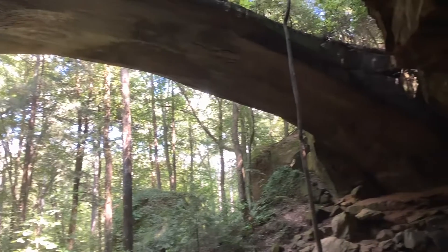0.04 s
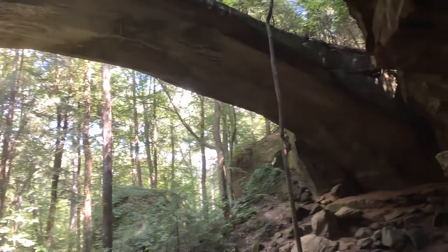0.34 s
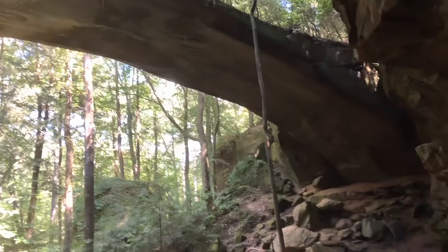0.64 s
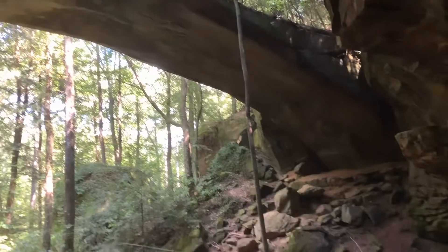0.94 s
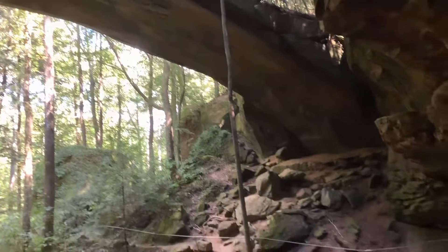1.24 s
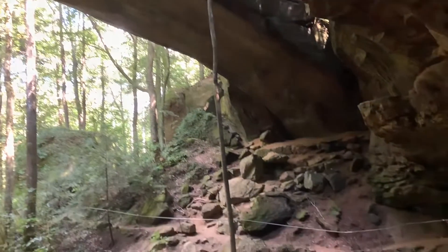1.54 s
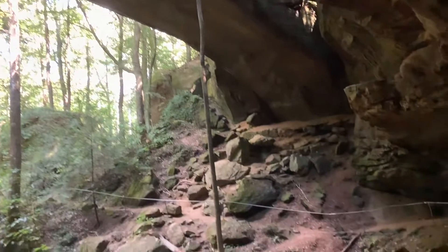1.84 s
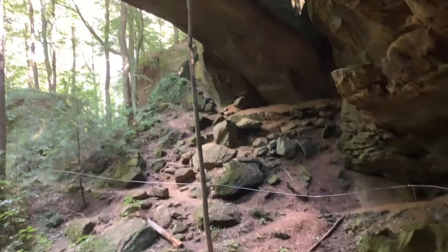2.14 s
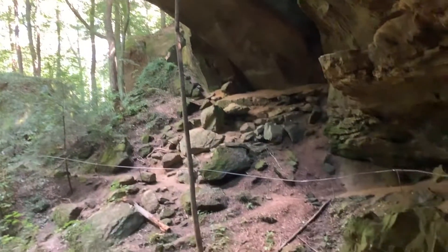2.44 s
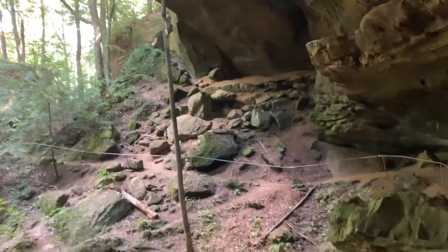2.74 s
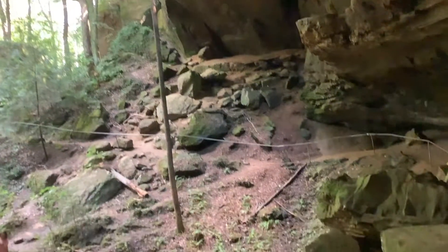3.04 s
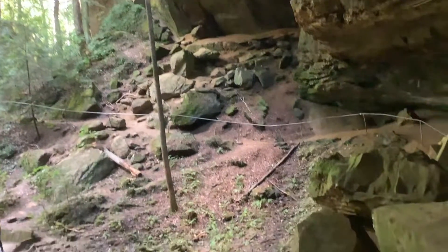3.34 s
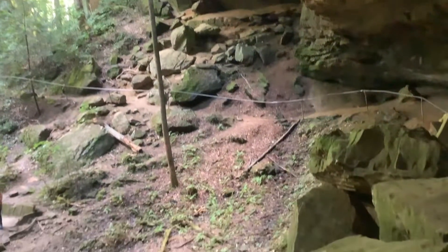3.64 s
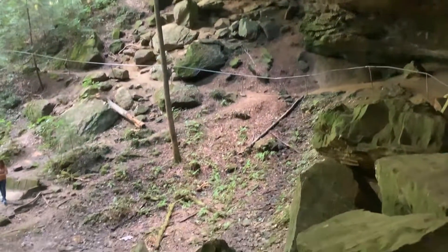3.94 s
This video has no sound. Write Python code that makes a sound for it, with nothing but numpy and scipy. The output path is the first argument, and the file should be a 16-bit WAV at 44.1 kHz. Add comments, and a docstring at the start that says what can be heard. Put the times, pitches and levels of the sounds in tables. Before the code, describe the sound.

Sparse drops of water tick and splash with a slight echo beneath a rock ledge in a quiet, faintly hissing forest. Dull footsteps and light scuffs sound nearby, soft at first and heavier toward the end.

```python
"""Water drips under a rock overhang in a forest: each impact ticks on stone or leaves, then spatters.
Soft taps and footfalls thud close by, each sweeping down in pitch because its bass arrives late.
Gritty scuffs and small splashes swell briefly. Beneath lie a steady hiss of leaves and water, low
outdoor noise, a faint rumble of air and a thin insect band. Reflection from the rock adds a short echo."""
import sys
import numpy as np
from scipy import signal
from scipy.fft import rfft, irfft, next_fast_len
from scipy.io import wavfile
from scipy.ndimage import uniform_filter1d, map_coordinates

SR = 44100
rng = np.random.default_rng(int(sys.argv[2]) if len(sys.argv) > 2 else 0)


def log_audio(samples):
    """Write samples as a 16-bit WAV file to the path given in sys.argv[1]."""
    # one column per channel
    frames = np.atleast_2d(samples).T
    # limit to full scale, then quantise
    limited = np.clip(frames, -1, 1)
    pcm = np.round(limited * 32767).astype(np.int16)
    wavfile.write(sys.argv[1], SR, pcm)


N = 176400

# Spectra of the background noises (frequency [Hz], relative density [dB])
HISS_SPECTRUM = [(500, -17), (900, -8.5), (1200, -3), (2300, 1), (4500, 0.5), (5900, -2.5), (7200, 0),
                 (8300, -8), (10000, -11), (12300, -20.5), (15600, -23)]
SPRAY_SPECTRUM = [(5000, -6.5), (9000, 0), (11500, -10), (15700, -12)]
FOREST_SPECTRUM = [(30, -65), (55, -54), (90, 2.5), (170, 0.5), (450, -6.5), (900, -10), (2000, -33),
                   (5000, -56)]
AIR_SPECTRUM = [(20, -52), (35, -40), (55, -2.5), (80, 8), (110, -17.5), (200, -10.5), (600, -63)]
# Their slow envelopes (time [s], level [dB])
HISS_ENVELOPE = [(0, -65), (.4, -60), (1.55, -60.5), (1.8, -57), (2.03, -57), (2.22, -62.5), (2.55, -59.5),
                 (2.88, -61.5), (3.25, -56), (4, -61)]
SPRAY_ENVELOPE = [(0, -63), (.42, -62.5), (.52, -67), (.87, -68), (1.8, -76.5), (1.93, -70), (2.21, -86),
                  (2.3, -65.5), (2.85, -76), (4, -81)]
FOREST_ENVELOPE = [(0, -71), (1.2, -63), (1.62, -61), (1.78, -56), (2.25, -62), (2.6, -55.5), (3.05, -60.5),
                   (4, -55)]
AIR_ENVELOPE = [(0, -61.5), (.65, -65), (1.05, -56), (1.45, -60), (4, -67.5)]
# Gritty scuffs and small water splashes (time [s], length [s], level [dB], centre [Hz], width [octaves])
GRAINY_SWELLS = [(0.106, 0.024, -51.5, 875, 0.86), (0.285, 0.02, -60, 1400, 0.44),
                 (0.766, 0.093, -56.5, 1970, 0.95), (0.981, 0.032, -56.5, 1840, 0.28),
                 (1.058, 0.054, -60, 1460, 0.37), (1.693, 0.028, -52.5, 1780, 0.28),
                 (2.069, 0.081, -57.5, 1830, 0.39), (2.427, 0.097, -53, 670, 0.4),
                 (2.755, 0.081, -48, 284, 0.37), (3.073, 0.13, -57, 3070, 0.72),
                 (3.291, 0.099, -54.5, 480, 0.72), (3.685, 0.07, -53, 1290, 0.72),
                 (3.793, 0.16, -55.5, 890, 0.87), (3.861, 0.17, -52, 3000, 0.29)]
# Taps and footfalls (time [s], first-contact level [dB], low edge [Hz], high edge [Hz])
SOFT_IMPACTS = [(.111, -31, 75.4, 251), (.114, -38.5, 378, 820), (0.141, -35.5, 64.6, 113),
                (0.184, -46, 78, 137), (0.293, -47.5, 200, 417), (0.298, -38.5, 66.4, 91),
                (.434, -54, 220, 420), (0.463, -54, 159, 230), (0.818, -49, 80, 260),
                (0.962, -40, 173, 635), (0.98, -55, 60, 88), (1.261, -48.5, 65, 130),
                (1.549, -44, 200, 394), (1.552, -35.5, 67.6, 127), (1.711, -47.5, 69, 250),
                (1.9229, -36, 112, 574), (2.387, -45, 130, 485), (2.4566, -33.5, 270, 466),
                (2.46, -32, 81.4, 150), (2.768, -39.5, 149, 373), (2.844, -43, 90, 169),
                (2.925, -43.5, 120, 397), (3.2464, -27.5, 192, 430), (3.246, -20, 74.6, 148),
                (3.258, -19.5, 73, 145), (3.295, -33.5, 95, 187), (3.31, -32, 72, 145),
                (3.518, -13, 132, 513), (3.6819, -27, 142, 453), (3.841, -40.5, 167, 413),
                (3.859, -38, 113, 210)]
# Near drops (time [s], tick level [dB], centre [Hz], width [octaves], splash level [dB])
DROP_IMPACTS = [(.2643, -52, 10800, 0.18, -56), (0.3012, -38, 8500, 1.2, -50.5),
                (0.359, -35.5, 5030, 0.19, -46), (.398, -46, 9800, .13, -57),
                (0.4432, -49, 2700, 0.29, -55), (.555, -49, 3120, 0.21, -56), (0.624, -52, 2600, 0.24, -55),
                (.669, -48, 9200, 0.17, -53), (0.855, -54, 4900, 0.6, -50.5), (.862, -45, 930, 0.064, -52),
                (1.094, -50, 3100, .28, -50.5), (1.3228, -48, 8650, 0.18, -55),
                (1.343, -51, 3500, 0.74, -56), (1.446, -41.5, 6200, 0.51, -62),
                (1.536, -42, 4250, 0.47, -57), (1.646, -44, 6430, 0.2, -51), (1.728, -49, 3300, .3, -53),
                (1.753, -44, 2300, .3, -52.5), (1.9014, -48, 9460, 1.9, -51.5),
                (2.129, -39, 10500, 0.25, -66), (2.3058, -43.5, 8300, 0.2, -56),
                (2.31, -52, 2420, 0.3, -56), (2.493, -51, 3130, 0.19, -52), (2.5364, -42, 3830, 0.25, -52),
                (2.5616, -54, 6940, 0.18, -53), (2.702, -51, 8650, 0.23, -57),
                (2.945, -47, 4400, 0.21, -54), (2.9766, -45, 9800, 0.22, -63),
                (2.9916, -42.5, 2220, 0.48, -58), (3.002, -34.5, 4800, .45, -46),
                (3.12, -42.5, 805, 0.063, -55), (3.1994, -50, 9000, 0.092, -61),
                (3.3615, -36, 7100, 0.3, -57), (3.375, -46, 7000, 0.17, -45.5),
                (3.426, -48, 5960, 0.17, -55), (3.866, -40, 3400, 0.48, -47.5),
                (3.907, -40, 3400, 0.14, -54)]
# Reverberation of the overhang (frequency [Hz], time to fall 60 dB [s])
ROCK_T60 = [(200, 0.35), (2000, 0.45), (10000, 0.086)]


def amp(db):
    return 10 ** (np.asarray(db) / 20)


def unit_rms(x):
    return x / np.sqrt(np.mean(x ** 2) + 1e-20)


def at_frequency(points, hz):
    """Interpolation of (frequency, value) points on a logarithmic axis."""
    f, values = np.transpose(points)
    return np.interp(np.log(hz + 1), np.log(f + 1), values)


def curve(points):
    """Linear interpolation of (time, value) points at every sample."""
    return np.interp(np.arange(N) / SR, *np.transpose(points))


def wobble(per_s):
    """Smooth random modulation: a spline through per_s knots a second."""
    knots = rng.standard_normal(int(N * per_s / SR) + 4)
    return map_coordinates(knots, [np.arange(N) * per_s / SR])


def rolloff(ratio, order):
    """Butterworth magnitude response, 3 dB down at a frequency ratio of 1."""
    return 1 / np.hypot(1, ratio ** order)


def filtered(x, response):
    """Linear filtering: the spectrum is multiplied by a frequency response."""
    size = next_fast_len(len(x) + SR // 10)
    return irfft(rfft(x, size) * response(np.fft.rfftfreq(size, 1 / SR)), size)[:len(x)]


def band(x, hz, octaves):
    """Band-pass filtering, Gaussian in log frequency."""
    return filtered(x, lambda f: np.exp(-(np.log2((f + 1) / hz) / octaves) ** 2 / 4))


def add(track, start_s, sound):
    """Superposition of a sound on the track."""
    part = track[max(round(start_s * SR), 0):][:len(sound)]
    part += sound[:len(part)]


def grit(hz, octaves, grain=0.6, size=16384):
    """Random amplitude modulation clumps band noise into millisecond grains."""
    clumps = unit_rms(uniform_filter1d(rng.standard_normal(size), size=44))
    return unit_rms(band(rng.standard_normal(size) * np.exp(grain * clumps), hz, octaves))


def patchy_noise(spectrum, patchy_db):
    """Coloured noise, modulated in random patches of time and frequency."""
    cells = signal.stft(rng.standard_normal(N), nperseg=512)[2]
    patches = uniform_filter1d(rng.standard_normal(cells.shape), size=5, axis=0)
    patches = unit_rms(uniform_filter1d(patches, size=9, axis=1))
    noise = signal.istft(cells * amp(patchy_db * patches), nperseg=512)[1][:N]
    return unit_rms(filtered(noise, lambda f: amp(at_frequency(spectrum, f))))


def forest():
    """Incoherent sources sum to a steady bed: leaves and water, fine spray, low noise, air, insects."""
    hiss = amp(curve(HISS_ENVELOPE) + 1.38 * wobble(21.06)) * patchy_noise(HISS_SPECTRUM, 1.8)
    spray_db = curve(SPRAY_ENVELOPE) + 2.7 * wobble(16) + 3 * wobble(450)
    spray = amp(spray_db) * patchy_noise(SPRAY_SPECTRUM, 1.5)
    low_noise = amp(curve(FOREST_ENVELOPE)) * patchy_noise(FOREST_SPECTRUM, 3)
    air = amp(curve(AIR_ENVELOPE) + 4 * wobble(7.8)) * patchy_noise(AIR_SPECTRUM, -2.5)
    insect_db = -67 + 2.5 * wobble(60)
    insects = amp(insect_db) * unit_rms(band(rng.standard_normal(N), hz=7200, octaves=0.071))
    return hiss + spray + low_noise + air + insects


def splash(hz, octaves, t60, rise_s=0.0011):
    """Scattered droplets make grainy noise with a fast rise and an exponential decay."""
    spray = grit(hz, octaves)
    t = np.arange(len(spray)) / SR
    return spray * (1 - np.exp(-t / rise_s)) * amp(-60 * t / t60)


def far_drips(per_s=26):
    """Independent drops arrive as a Poisson process, each ringing faintly in a narrow band."""
    out = np.zeros(N)
    deviations = rng.standard_normal((400, 2))
    times = np.cumsum(rng.exponential(1, len(deviations))) / per_s
    for start_s, (pitch, strength) in zip(times[times < N / SR], deviations):
        hz = np.clip(3200 * 2 ** (0.8 * pitch), 1500, 11000)
        add(out, start_s, amp(-61 + 1.2 * strength) * splash(hz, octaves=0.11, t60=0.11))
    return out


def scuffs_and_splashes(rise_share=0.18):
    """Gritty scuffs and small water splashes: amplitude envelopes shape short swells of grainy noise."""
    out = np.zeros(N)
    for start_s, length_s, db, hz, octaves in GRAINY_SWELLS:
        grains = grit(hz, octaves)
        age = np.arange(len(grains)) / SR / (length_s * rise_share)  # 1 at the crest
        add(out, start_s, amp(db) * grains * np.sqrt(age * np.exp(1 - age)))
    return out


def taps(lag_cycles=2.15, lead_s=0.02, snap_hz=1913, bounce_s=0.00597, shudder_t60=0.069):
    """Dispersion: group delay grows toward the bass, so each soft impact sweeps down in pitch."""
    out = np.zeros(N)
    t = np.arange(SR // 2) / SR
    f = np.fft.rfftfreq(len(t), 1 / SR) + 1
    lag = np.exp(-2j * np.pi * (lag_cycles * np.log(f / snap_hz) + f * lead_s))
    bounce = amp(-15) * np.exp(-2j * np.pi * f * bounce_s)  # a weak second contact
    snap = rolloff(f / snap_hz, 6)
    crack = amp(-29.5) * rolloff(f / 7000, 4)
    for start_s, db, low_hz, high_hz in SOFT_IMPACTS:
        snap_db = -17.5 + 18 * np.log2(high_hz / 500) + 0.33 * db  # brighter, harder taps snap more
        body = rolloff(f / high_hz, 6.2)
        bass_cut = rolloff(low_hz / f, 4.9) * rolloff(52 / f, 6)
        push = lag * np.hypot(body, amp(snap_db) * (snap + crack)) * bass_cut
        shudder = rng.standard_normal(len(t)) * amp(-60 * t / shudder_t60)
        contact = 1 + bounce + amp(-12.5) * rfft(shudder / np.linalg.norm(shudder))
        thud = irfft(push * contact) / np.abs(irfft(push)).max()
        add(out, start_s - lead_s, amp(db) * thud)
    return out


def near_drips(tick_s=0.00087):
    """A drop's impact on stone radiates a brief transient, then a splash in the same band."""
    out = np.zeros(N)
    t = np.arange(SR // 50) / SR
    for start_s, tick_db, hz, octaves, splash_db in DROP_IMPACTS:
        tick = grit(hz, octaves, grain=0)[:len(t)] * t * np.exp(-2 * t / tick_s)
        add(out, start_s, amp(tick_db) * tick / np.abs(tick).max())
        add(out, start_s, amp(splash_db) * splash(hz, octaves, t60=0.12))
    return out


def rock_echo(x):
    """Reverberation: reflections from the overhang decay at a rate that depends on frequency."""
    hz, t, cells = signal.stft(rng.standard_normal(SR // 2), SR, nperseg=256)
    decay = amp(-60 * t / at_frequency(ROCK_T60, hz)[:, None])
    tail = signal.istft(cells * decay, SR, nperseg=256)[1]
    return signal.fftconvolve(x, tail / np.linalg.norm(tail))[:N]


def scene():
    """Direct and reflected sound superpose; the taps are close and so nearly dry."""
    drips_and_scuffs = near_drips() + far_drips() + scuffs_and_splashes()
    softened = filtered(drips_and_scuffs, lambda f: rolloff(f / 11700, 4))  # less top treble
    close = taps()
    echo = rock_echo(amp(-10) * softened + amp(-45) * close)
    return (softened + close + echo + forest())[None]


def record(dry, top_hz=15780):
    """Band limiting: an ideal low-pass filter removes the highest treble."""
    return filtered(dry[0], lambda hz: hz < top_hz)[None]


dry = scene()
out = record(dry)
log_audio(out)
```